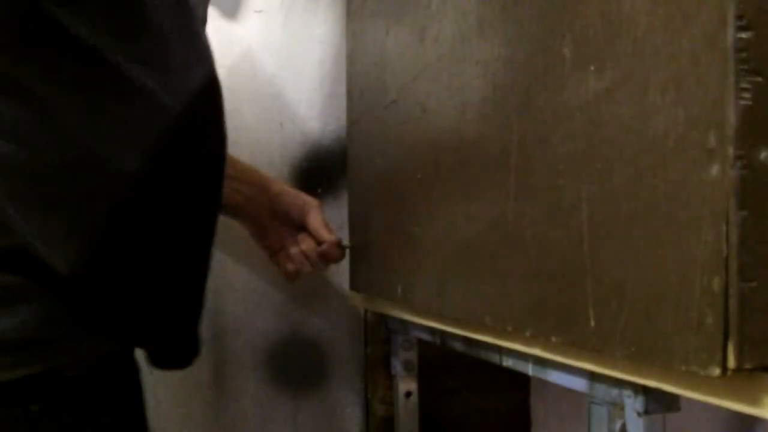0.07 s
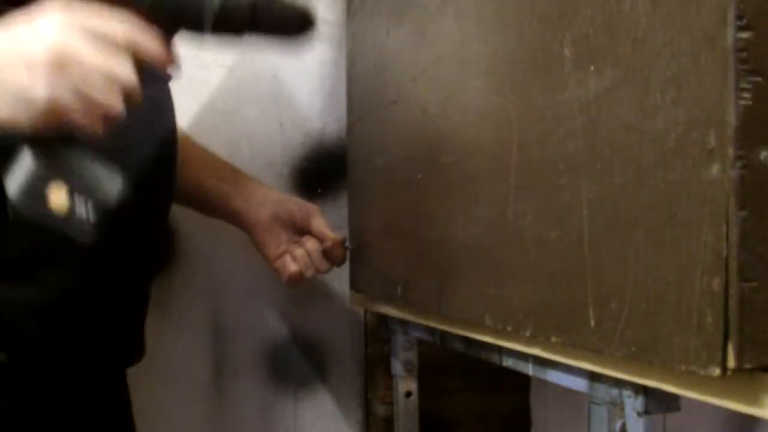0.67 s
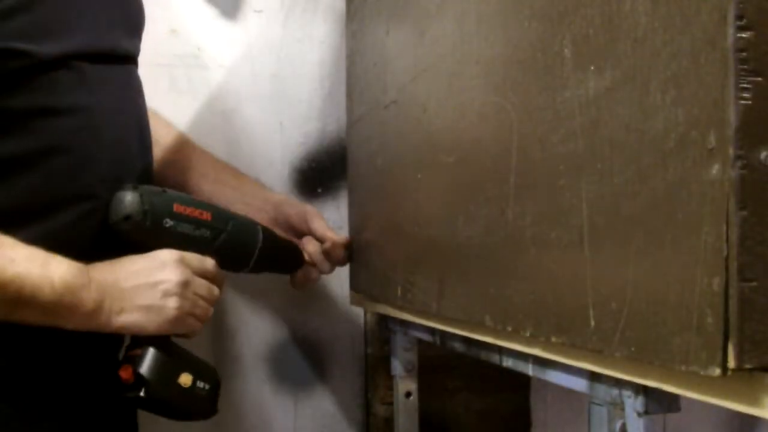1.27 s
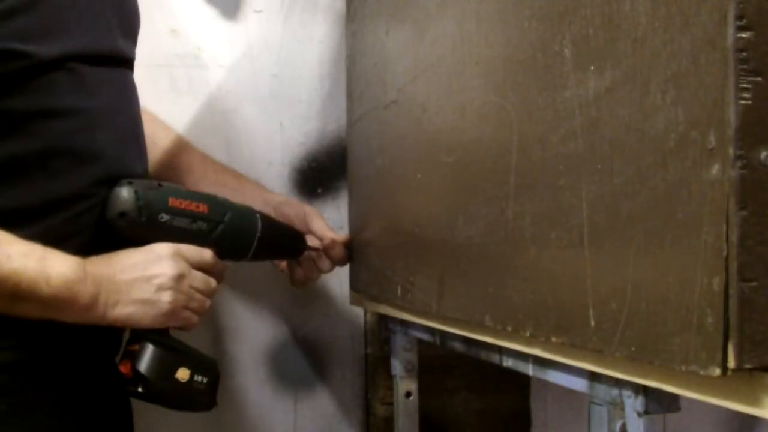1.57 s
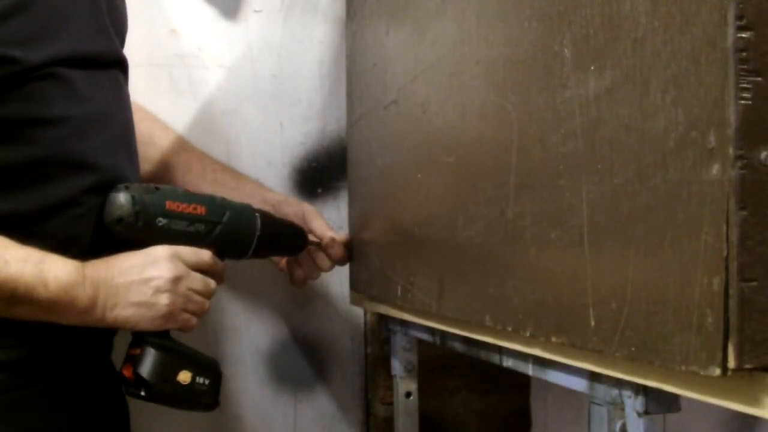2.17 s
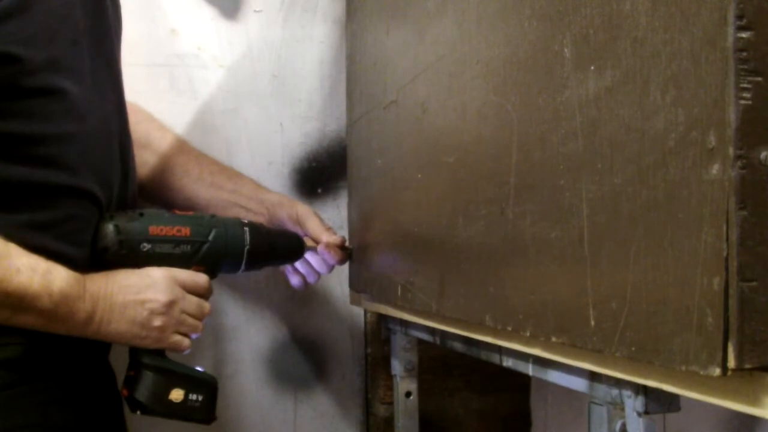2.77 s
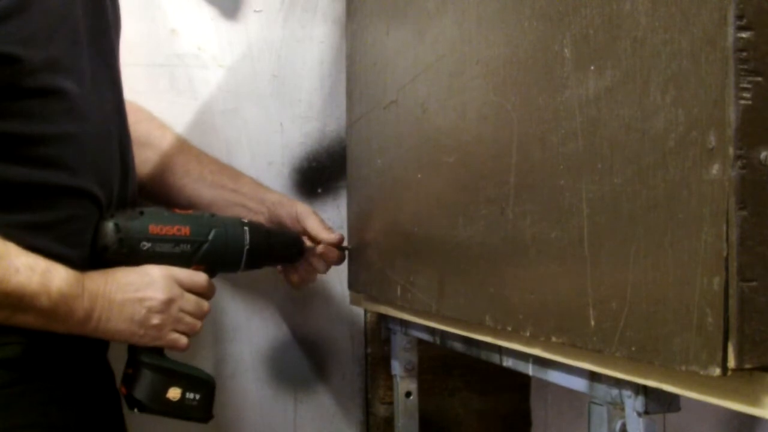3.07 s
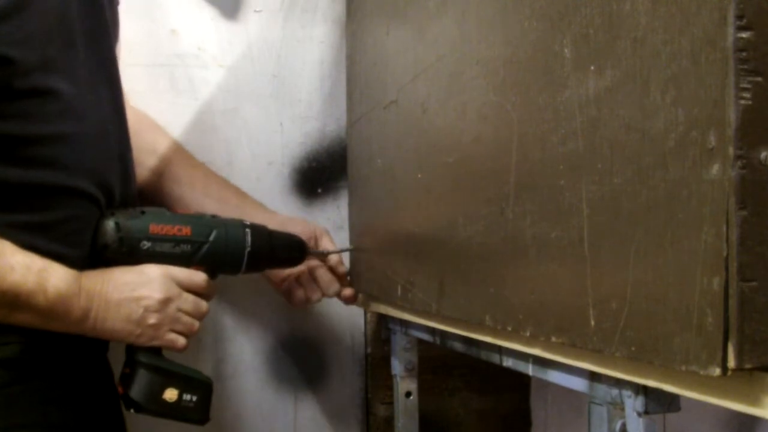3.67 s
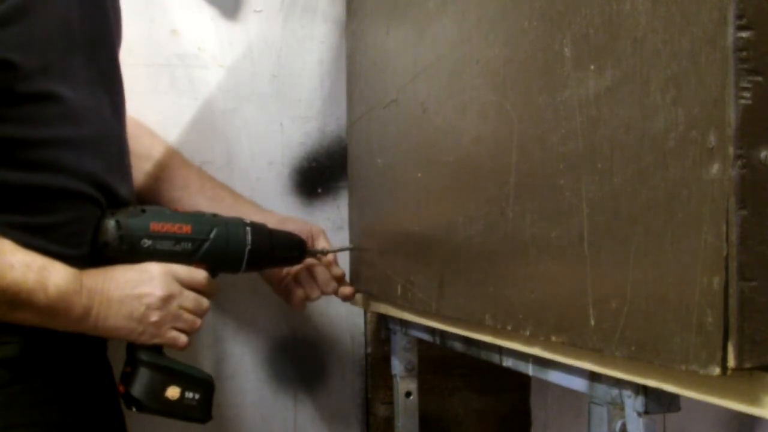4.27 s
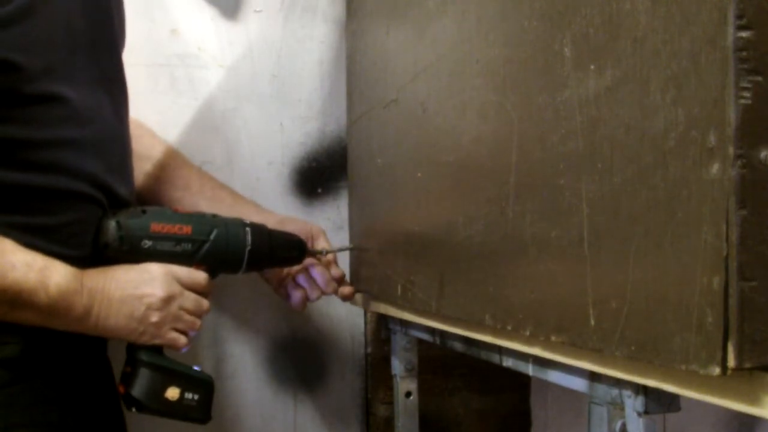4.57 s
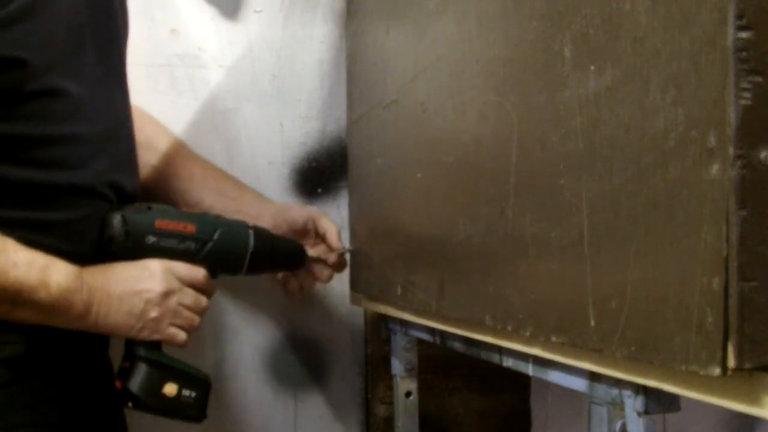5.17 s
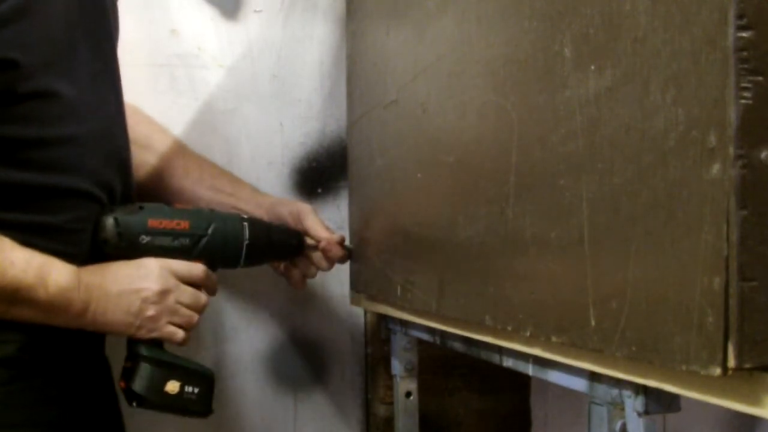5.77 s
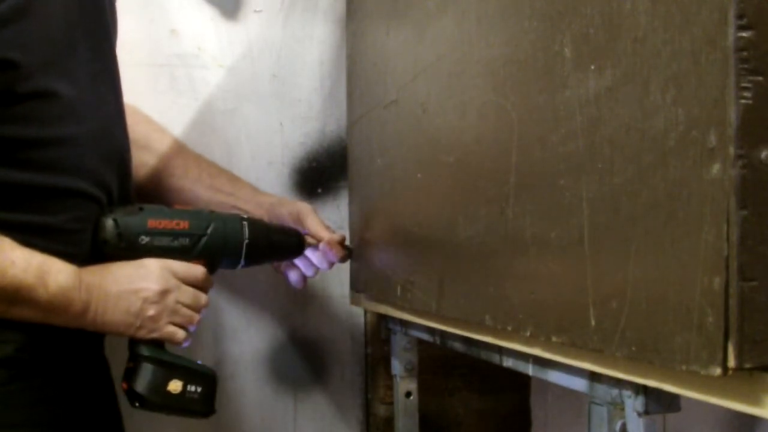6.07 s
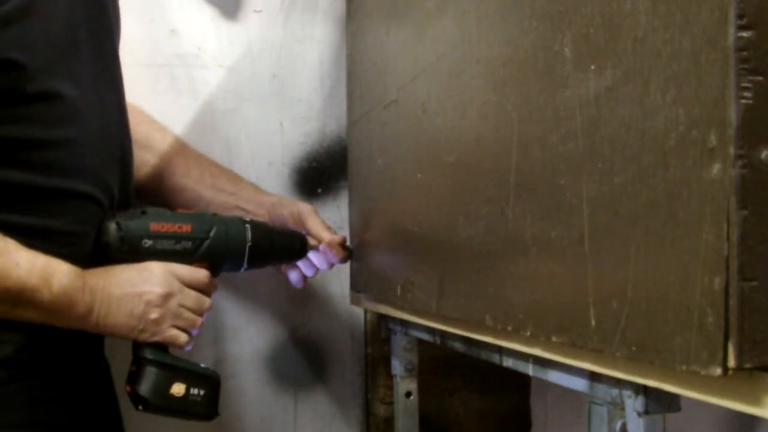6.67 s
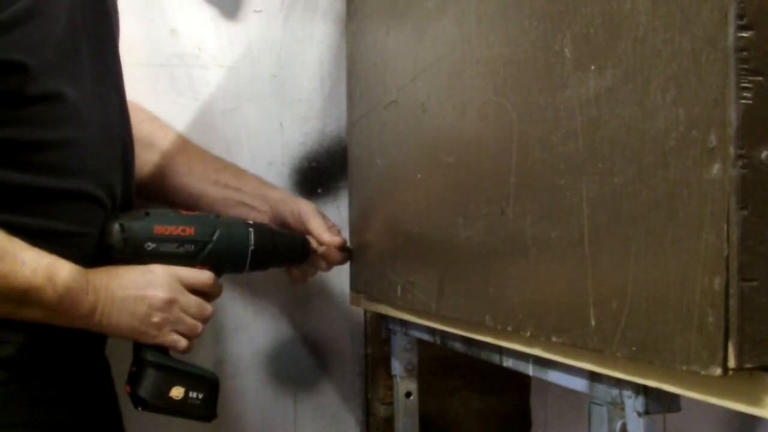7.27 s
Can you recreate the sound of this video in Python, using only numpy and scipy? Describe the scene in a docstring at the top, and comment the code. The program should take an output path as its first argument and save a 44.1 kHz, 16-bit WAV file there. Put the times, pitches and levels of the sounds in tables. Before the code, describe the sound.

A sleeve brushes softly through the first 0.7 seconds, and a wooden lid scrapes briefly at 0.4 between two light knocks. Faint hollow taps on the wooden case follow from 1.2 to 2.4 seconds, with a steel click near 2.1. At 2.6 a cordless drill whines up for a quarter second, its motor hissing, and stops quickly. A firmer knock comes at 3.4, then a few faint ticks. At 4.7 the drill runs again and bites loudly into the wood, slowing and shaking the case with a rough crunch. Three sharp, loud steel clicks sound between 5.1 and 5.4. Four more quarter-second bursts follow at about 5.5, 6.1, 6.6 and 7.0, the first biting hard, mixed with wooden knocks and small trigger clicks. Everything is about a metre away in a small workshop, with short reverberation and very quiet room tone.

```python
"""A cordless drill fastens a wooden case shut in a small workshop, about a metre away.
It runs in six short bursts: the gears whine up, the motor hisses, and the bit bites, slowing the
motor and shaking the wood. Steel chuck, bit and trigger click between runs. Lid and drill knock on
the panel and ring its modes; a sleeve brushes past and the lid scrapes into place over quiet room tone."""
import sys
import numpy as np
from scipy import signal
from scipy.fft import rfft, irfft, next_fast_len
from scipy.io import wavfile

SR = 44100
rng = np.random.default_rng(int(sys.argv[2]) if len(sys.argv) > 2 else 0)


def master(y):
    """Save y as 16-bit WAV."""
    cut = np.clip(np.atleast_2d(y).T, -1, 1)
    pcm = np.round(cut * 32767)  # scale
    wavfile.write(sys.argv[1], SR, pcm.astype(np.int16))


N = 327222
TIME = np.arange(N) / SR


def undb(db):
    """Decibels to gain."""
    return 10 ** (np.asarray(db) / 20)


def unit(x):
    """Scale to rms 1."""
    return x / np.sqrt(np.mean(x ** 2))


def lookup(hz, points, column=1):
    """Read a table over log frequency."""
    table = np.array(points, float)
    return np.interp(np.log(hz + 1), np.log(table[:, 0]), table[:, column])


def colour(x, points):
    """Filter by a (Hz, dB) curve."""
    size = next_fast_len(x.shape[-1] + 4096)
    gain = undb(lookup(np.fft.rfftfreq(size, 1 / SR), points))
    return irfft(rfft(x, size) * gain, size)[..., :x.shape[-1]]


def walk(rate_hz):
    """Smooth random drift, rms 1."""
    return unit(np.interp(TIME * rate_hz, np.arange(N), rng.standard_normal(N)))


def grains(rate_hz, spread_db):
    """Sparse snaps of unequal size."""
    snaps = (rng.random(N) < rate_hz / SR) * rng.standard_normal(N)
    return snaps * undb(spread_db * np.minimum(rng.exponential(size=N), 3))


def swells(rows, attack_s, release_s):
    """Gain of gestures: each sets in, grows or eases while it lasts, and dies away."""
    gain = np.zeros(N)
    for start_s, length_s, db, growth_db in rows:
        age = TIME - start_s
        held = undb(db + growth_db * np.clip(age / length_s, 0, 1))
        gain += held * np.clip(age / attack_s, 0, 1) * np.exp(-np.maximum(age - length_s, 0) / release_s)
    return gain


def add(out, start_s, sound):
    """Mix a sound in at start_s."""
    start = max(0, int(start_s * SR))
    out[:, start:start + sound.shape[-1]] += sound[..., :N - start]


def through(x, response):
    """Convolve with a stereo impulse response."""
    return signal.fftconvolve(np.atleast_2d(x), response, axes=-1)[:, :N]


# Each row: frequency in Hz, side minus mid in dB.
DIFFUSE_WIDTH = [(100, -32), (380, -27), (700, -22), (1300, -21), (2400, -14), (4400, -5), (14000, -1)]

def diffuse(size, width=DIFFUSE_WIDTH):
    """Stereo noise: alike in the bass, unrelated in the treble."""
    mid, side = rng.standard_normal((2, size))
    side = colour(side, width)
    return np.array([mid + side, mid - side])


def tail(bands):
    """Dense resonances: half-octave bands of noise, each dying at its own rate."""
    t = TIME[:SR * 3 // 4]
    spectrum = rfft(diffuse(len(t)))
    hz = np.fft.rfftfreq(len(t), 1 / SR)
    out = 0
    for centre_hz in 45 * 2 ** (np.arange(18) / 2):
        band = np.maximum(0, 1 - 2 * abs(np.log2((hz + 1) / centre_hz)))
        decay = 1000 ** (-t / lookup(centre_hz, bands, column=2))
        out += irfft(spectrum * band, len(t)) * undb(lookup(centre_hz, bands)) * decay
    return out / np.sqrt(np.sum(out ** 2) / 2)


def ring(modes, scatter_db=4.5):
    """Decaying modes; every point of contact weights them differently."""
    t = TIME[:SR * 3 // 4]
    out = 0
    for k, (hz, db, t60_s) in enumerate(modes):
        weight = (-1) ** k * undb(db + scatter_db * rng.standard_normal())
        out += weight * np.sin(2 * np.pi * hz * t) * 1000 ** (-t / t60_s)
    return out


# Each row: frequency in Hz, relative level in dB, T60 in seconds.
ROOM_BANDS = [(101, 3, 0.19), (690, 16, 0.22), (2630, 8, 0.35), (7500, 11, 0.22), (15000, 4, 0.22)]

def in_room(sound, room_db):
    """Direct sound plus workshop reverberation."""
    return sound + undb(room_db) * through(sound, tail(ROOM_BANDS))


# Each row: frequency in Hz, relative density in dB.
AIR_SPECTRUM = [(15, -56), (25, -13), (75, -7), (96, -6), (113, -6), (133, -16), (198, -12), (313, -5),
                (1020, -4.5), (2420, -10), (2850, -7.5), (3630, -10.5), (15500, -12.5)]
# Each row: frequency in Hz, side minus mid in dB.
AIR_WIDTH = [(100, -16), (200, -6.5), (1300, -3), (5000, -1)]

def room_tone(level_db=-64.5):
    """Quiet, steady rumble and hiss."""
    return undb(level_db) * unit(colour(diffuse(N, AIR_WIDTH), AIR_SPECTRUM))


# Each row: start in seconds, length in seconds, level in dB, growth in dB.
SLEEVE_STROKES = [(0, 0.069, -56, -1.5), (.09, 0.1, -66.5, 7.5), (.2, 0.063, -66, 7),
                  (.257, 0.17, -45.5, 4.5), (.57, 0.034, -64.5, 9), (.622, 0.096, -51, 4.5),
                  (1.04, 0.16, -63.5, -2), (2.285, 0.22, -59, -8.5), (3.24, 0.055, -66.5, 2),
                  (3.4, 0.17, -57.5, -7), (3.56, 0.02, -48.5, -2.5), (6.86, .13, -61.5, -5)]
# Each row: frequency in Hz, relative density in dB.
CLOTH_SPECTRUM = [(88, -50.5), (150, -27), (225, -14.5), (279, -45), (396, -8.5), (966, -11), (1940, -7.5),
                  (5330, -14), (12800, -11), (15500, -21)]

def sleeve(rough_db=1.0):
    """Cloth slides in countless small catches."""
    friction = unit(colour(diffuse(N), CLOTH_SPECTRUM) * undb(rough_db * walk(300)))
    return friction * swells(SLEEVE_STROKES, attack_s=.013, release_s=.036)


# Each row of both: frequency in Hz, relative level in dB, T60 in seconds.
PANEL_MODES = [(171.7, 1, 0.41), (195.7, -7.5, 0.37), (226.5, -4, 0.44), (258, -10.5, 0.51),
               (340, -11, 0.17), (415.7, 2, 0.29), (475, -13, 0.14), (529, -0.5, 0.45), (573, -8, 0.27),
               (627, 1, 0.13), (661, 0, 0.32), (740, 3, 0.22), (794, -21, 0.37), (827, -6.5, 0.39),
               (903, -13.5, 0.33), (1065, 6.5, 0.13), (1097, -9, 0.59), (1417, -2.5, 0.021),
               (1710, 3, 0.19)]
CASE_BANDS = [(64.4, -17, 0.53), (114, -26.5, 1), (180, -19.5, 0.6), (430, -0.5, 0.23), (910, -1.5, 0.23),
              (1670, -3, 0.15), (3620, -14, 0.17), (6500, -22.5, 0.26), (13900, -23, 0.125)]

def panel(modes_db, direct=.25, direct_s=.0015):
    """The case's response to one tap: low panel modes over a dense tail led by the direct knock."""
    modes = ring(PANEL_MODES)
    dense = tail(CASE_BANDS) * (1 + direct * np.exp(-TIME[:len(modes)] / direct_s))
    return undb(modes_db) * modes / np.sqrt(np.sum(modes ** 2)) + dense / np.sqrt(np.sum(dense ** 2) / 2)


# Each row: start in seconds, level in dB, hardness in dB, scuff level in dB, favoured resonance in Hz.
PANEL_KNOCKS = [(0.02, -59, 0, -72, 2090), (0.275, -44, -18, -63, 222), (0.554, -46, -18, -48.5, 428),
                (1.173, -44.5, -10, -46, 580), (1.427, -51, 2.5, -71, 1890), (1.659, -55, 5.5, -63, 488),
                (1.781, -62.5, -1, -78, 1690), (1.885, -58, 11, -77, 1920), (1.912, -61.5, -10, -76, 590),
                (2.059, -53.5, 7, -66, 2030), (2.2, -49, 4.5, -58, 1740), (2.34, -43.5, 3, -39.5, 1240),
                (2.347, -42, -1, -43, 740), (3.207, -44.5, -17, -63, 390), (3.353, -31, -2, -42, 410),
                (3.681, -64, -10, -51, 395), (4.683, -50, 12, -52, 1905), (4.707, -45.5, 12, -54, 1500),
                (4.846, -29, 5.5, -31, 1530), (4.969, -35, -7, -22, 1900), (5.099, -42, 5, -36.5, 1100),
                (5.2994, -49.5, 10.5, -56, 2450), (5.351, -42, 6, -46, 2400), (5.564, -40.5, 8, -54, 2260),
                (5.693, -32.5, 3, -44, 420), (6.193, -32.5, 13, -44, 1060), (6.26, -33.5, 6.5, -47, 1860),
                (6.385, -37.5, -2, -31, 790), (7.255, -40.5, 2, -50.5, 403)]

def knocks(favour_db=3, lead_s=.02, touch_s=.0042, scuff_s=.009):
    """Lid, drill and bit knock and scuff the panel; harder contacts give more treble and less bass."""
    wood, scuffs = np.zeros((2, 2, N))
    t = TIME[:SR // 8] - lead_s
    contact = np.exp(np.minimum(t / touch_s, -t / scuff_s))
    for start_s, db, hard_db, scuff_db, favoured_hz in PANEL_KNOCKS:
        tilt = [(200, -.17 * hard_db), (700, .022), (2000, hard_db), (3500, hard_db), (8000, hard_db - 5)]
        knock = colour(panel(modes_db=-5), tilt)
        knock += undb(favour_db) * signal.lfilter(*signal.iirpeak(favoured_hz, Q=6, fs=SR), knock)
        onset_rms = np.std(knock[:, :SR // 50])
        add(wood, start_s, undb(db) * knock / onset_rms)
        scuff = unit(colour(diffuse(len(t)), CLOTH_SPECTRUM)) * contact
        add(scuffs, start_s - lead_s, undb(scuff_db) * scuff)
    return wood + in_room(scuffs, room_db=-6)


# Each row: start in seconds, length in seconds, level in dB, growth in dB.
LID_SLIDES = [(.362, 0.077, -40.5, -4.5)]
# Each row: frequency in Hz, relative density in dB.
RASP_SPECTRUM = [(200, -30), (900, -5.5), (1900, -2.5), (2700, 0), (3600, -7), (5500, -13), (14000, -22)]

def lid_scrape():
    """Wood slides on wood in dense little slips."""
    slips = unit(colour(grains(rate_hz=5000, spread_db=-.5), RASP_SPECTRUM))
    return in_room(slips * swells(LID_SLIDES, attack_s=.0071, release_s=.012), room_db=-5)


# Each row: start in seconds, level in dB, gain below 3 kHz in dB.
STEEL_CLICKS = [(2.061, -31, 5.5), (2.578, -42.5, 7), (3.156, -51, 31), (3.5906, -45, -5), (3.682, -45, -2),
                (4.022, -51.5, 40), (4.5994, -43, 8), (5.1002, -16, 1.5), (5.2993, -12.5, -16),
                (5.3506, -11, -14), (5.9769, -36, 3), (6.5077, -40, 3), (6.9269, -39.5, 4.5)]
# Each row: frequency in Hz, relative density in dB.
SNAP_SPECTRUM = [(100, -32), (250, -7), (450, -25), (1000, -44), (2500, 10), (5500, 2), (8000, 5.5),
                 (12000, 9.5), (15500, -11)]
# Each row: frequency in Hz, relative level in dB, T60 in seconds.
STEEL_MODES = [(2270, -38, 0.061), (7730, 1, 0.011), (10150, 1.5, 0.0018), (10500, -38, 0.0046)]

def clicks(snap_s=.001, settle_s=.0052, ring_db=-10):
    """Chuck, bit and trigger: steel parts snap together, ring briefly and settle once more."""
    snaps, rings = np.zeros((2, 2, N))
    t = TIME[:4096]
    impacts = np.exp(-t / snap_s) + .15 * np.exp(-abs(t - settle_s) / snap_s)
    for start_s, db, low_db in STEEL_CLICKS:
        snap = colour(diffuse(len(t)) * impacts, SNAP_SPECTRUM)
        snap = colour(snap, [(3000, low_db), (7000, 0)])
        add(snaps, start_s, undb(db) * snap / abs(snap).max())
        add(rings, start_s, undb(db) * ring(STEEL_MODES, scatter_db=-4.5))
    # the snaps carry no deep bass
    snaps = signal.sosfilt(signal.butter(2, 420, "high", fs=SR, output="sos"), snaps)
    return in_room(snaps, room_db=-2.5) + undb(ring_db) * rings


# Each row: frequency in Hz, gain in dB.
HOUSING_RESPONSE = [(400, -23), (800, -8), (1050, 5.5), (1350, 0), (1850, -0.5), (2400, -5), (3300, -17),
                    (3950, 8), (4300, -10), (5000, -23)]

def gears(mesh_hz, torque, whine_db=-13, slow_stage=.36):
    """The mesh, its octave and a slower stage whine through the housing, harder under torque."""
    backlash = .014 * walk(500)
    phase = 2 * np.pi * np.cumsum(mesh_hz * (1 + backlash)) / SR
    tooth_force = .9 + .45 * walk(400)
    mesh = (np.sin(phase) + slow_stage * np.sin(phase / 2)) * tooth_force + np.sin(2 * phase)
    whine = colour(mesh, HOUSING_RESPONSE) * undb(2 * walk(120))
    return undb(whine_db) * (1 + 1.16 * torque) * whine


# Each row: frequency in Hz, relative density in dB.
MOTOR_SPECTRUM = [(88, -24), (150, -29.5), (302, -24), (388, -15), (812, -4.5), (1040, -6.5), (1420, -4.5),
                  (1870, -2.5), (2810, -7), (3410, -4.5), (3980, -1), (4650, -7.5), (5650, -10),
                  (11800, -2.5), (15500, -14)]
# Each row: frequency in Hz, side minus mid in dB.
MOTOR_WIDTH = [(100, -30), (700, -22), (2400, -19), (4400, -10), (8100, -3), (15000, -2)]

def motor(mesh_hz, drive, torque, teeth=9, hiss_db=1.8, shake_db=-43):
    """Brushes and fan hiss, throbbing with each shaft turn; the gears whine and the body shakes."""
    throb = 1 + .13 * np.cos(2 * np.pi * np.cumsum(mesh_hz) / SR / teeth)
    hiss = unit(colour(diffuse(N, MOTOR_WIDTH), MOTOR_SPECTRUM) * throb * undb(1.1 * walk(60)))
    shake_spectrum = [(25, -21), (60, -19), (85, 1), (120, -25), (400, -49), (2000, -80)]
    shake = unit(colour(rng.standard_normal(N), shake_spectrum))
    running = gears(mesh_hz, torque) + undb(hiss_db) * hiss + undb(shake_db) * shake
    return in_room(drive * running, room_db=-13)


# Each row: frequency in Hz, relative density in dB.
CUTTING_SPECTRUM = [(50, -3), (105, -6), (170, 2), (260, 1.5), (420, 4.5), (900, 3.5), (1600, 6.5),
                    (2600, 10.5), (3500, 13), (5500, 9.5), (15000, -6.5)]

def bite(pressure, wood_db=-2, bit_db=9, bit_hz=2465):
    """The bit tears fibres: a hail of tiny snaps shakes the case and rings the steel."""
    force = unit(colour(grains(rate_hz=2500, spread_db=4), CUTTING_SPECTRUM)) * pressure
    steel = signal.lfilter(*signal.iirpeak(bit_hz, Q=70, fs=SR), force)
    wood = through(force, panel(modes_db=-9))  # leaning on the drill damps the panel's modes
    return undb(wood_db) * wood + undb(bit_db) * steel


# Each row: start in seconds, hold in seconds, drive in dB, free-running gear mesh in Hz.
TRIGGER_PULLS = [(2.648, 0.25, -35, 1700), (4.678, .295, -32, 2200), (5.548, 0.22, -30, 2250),
                 (6.052, 0.25, -29.5, 2250), (6.582, .19, -30.5, 2150), (7.003, 0.24, -30.5, 2338)]
# Each row: start in seconds, length in seconds, load in dB, growth in dB.
BIT_LOADS = [(2.885, 0.0073, -41.5, -0.5), (4.755, 0.078, -35, -1.5), (4.828, .146, -23.5, 1),
             (5.686, 0.071, -28.5, -1.5), (6.19, .2, -43, 1.5), (7.13, 0.129, -43.5, 3.5)]

def drill(spin_up_s=.094, brake_s=.0255, wobble=.02, half_speed_db=-14, double_noise_db=-28):
    """Each pull spins the motor up until the brake stops it; a biting bit slows it and makes it labour."""
    load = swells(BIT_LOADS, attack_s=.01, release_s=.03)
    mesh_hz, drive, torque = np.zeros((3, N))
    for start_s, hold_s, db, free_hz in TRIGGER_PULLS:
        age = np.maximum(TIME - start_s, 0)
        spin = np.tanh(age / spin_up_s)
        brake = np.exp(-np.maximum(age - hold_s, 0) / brake_s)
        mesh_hz += free_hz * spin * brake
        drive += undb(db) * spin ** 1.32 * brake  # noise grows faster than speed
        torque += 4 * spin * (1 - spin) * brake
    mesh_hz = mesh_hz / (1 + load / undb(half_speed_db)) * (1 + wobble * walk(30))
    strain = 1 + load / undb(double_noise_db)
    jolt = undb(-46.5) * torque  # the bit kicks against the wood at spin-up
    rub = undb(-24.5) * drive
    return motor(mesh_hz, drive * strain, torque) + bite(load + jolt + rub)


def scene():
    """Stereo mix of the work on the case and the room tone."""
    return knocks() + clicks() + drill() + lid_scrape() + sleeve() + room_tone()


# Each row: frequency in Hz, left minus right in dB.
TREBLE_BALANCE = [(5000, 0), (9500, 2.5), (14000, 4.2)]

def record(dry, bass_hz=48, top_hz=15250):
    """The microphone hears more treble on the left and cuts the deep bass and the top."""
    ports = [colour(channel, [(hz, side * db / 2) for hz, db in TREBLE_BALANCE])
             for channel, side in zip(dry, (1, -1))]
    ports = signal.sosfilt(signal.butter(4, bass_hz, "high", fs=SR, output="sos"), ports)
    return signal.sosfilt(signal.ellip(10, .2, 70, top_hz, fs=SR, output="sos"), ports)


dry = scene()
out = record(dry)
master(out)
```